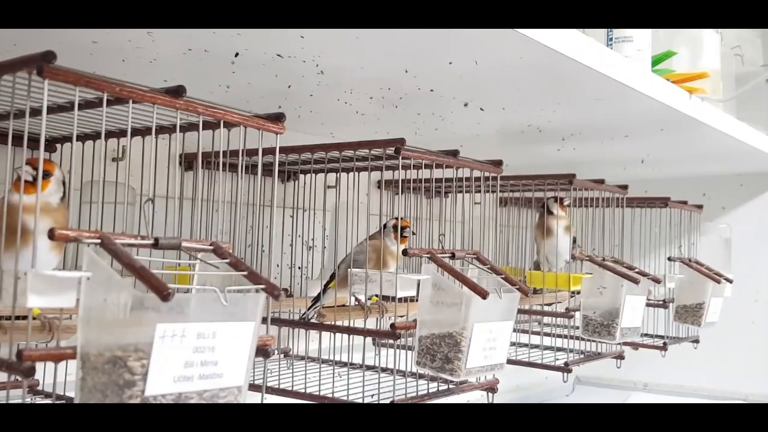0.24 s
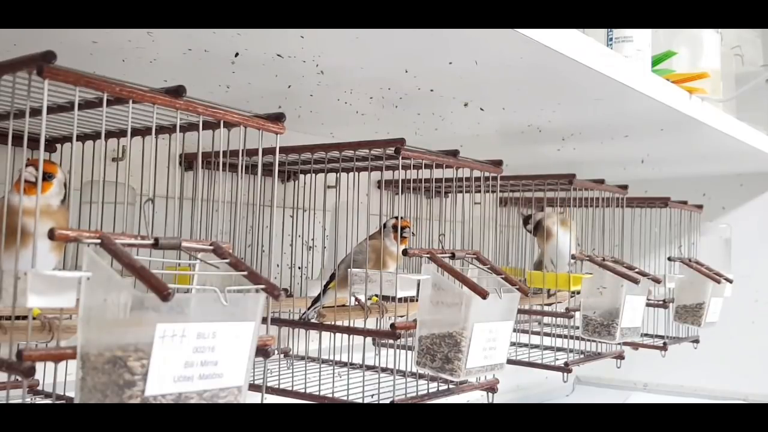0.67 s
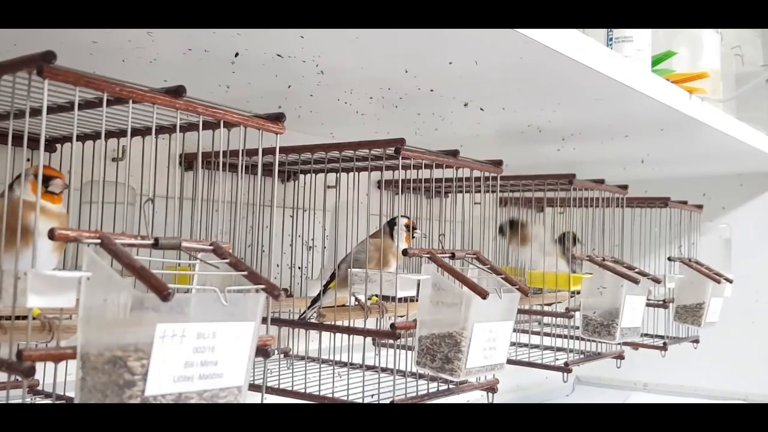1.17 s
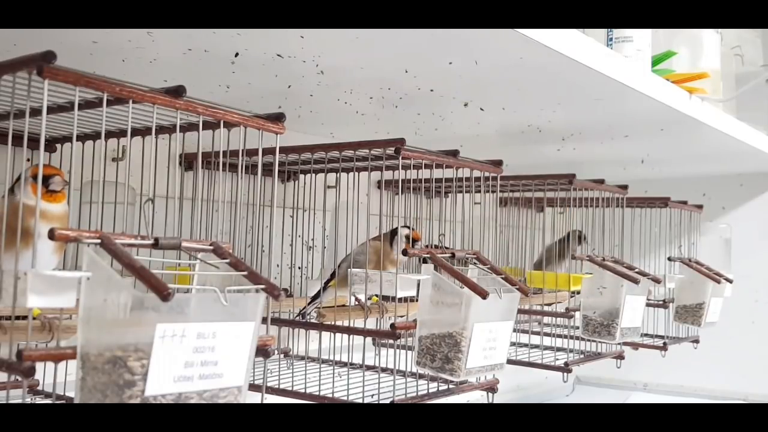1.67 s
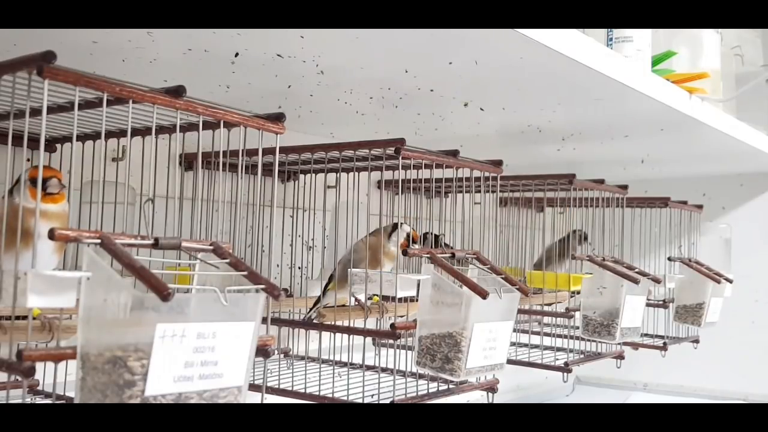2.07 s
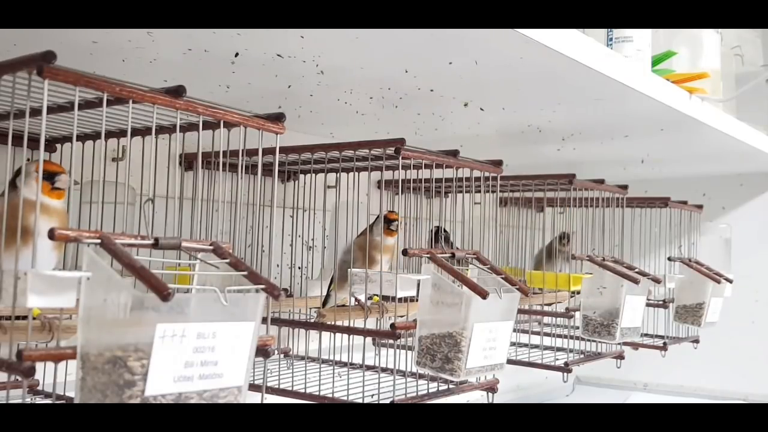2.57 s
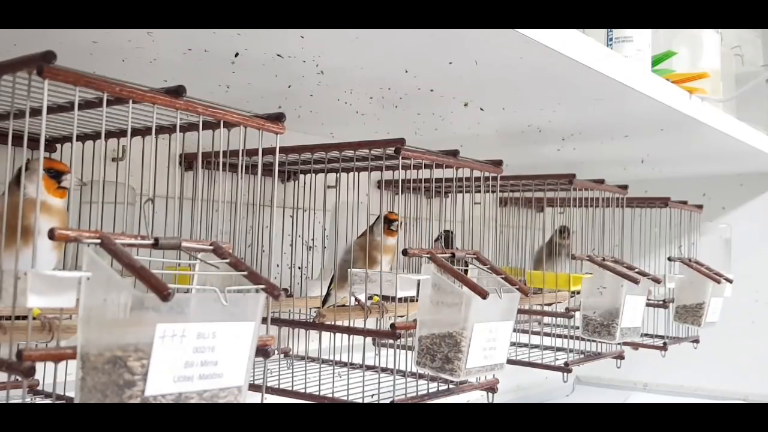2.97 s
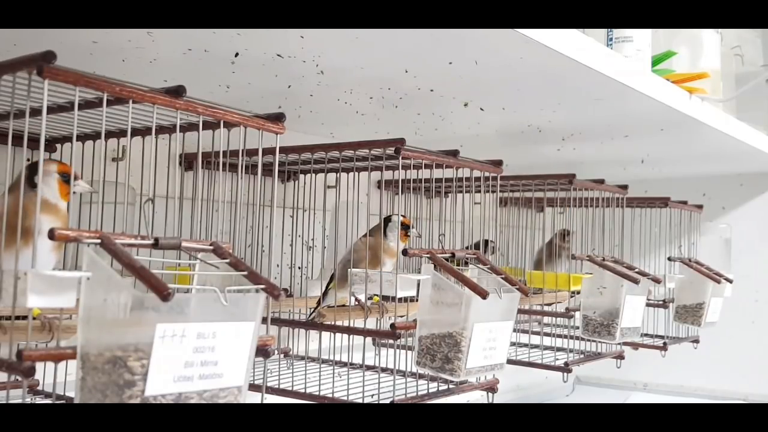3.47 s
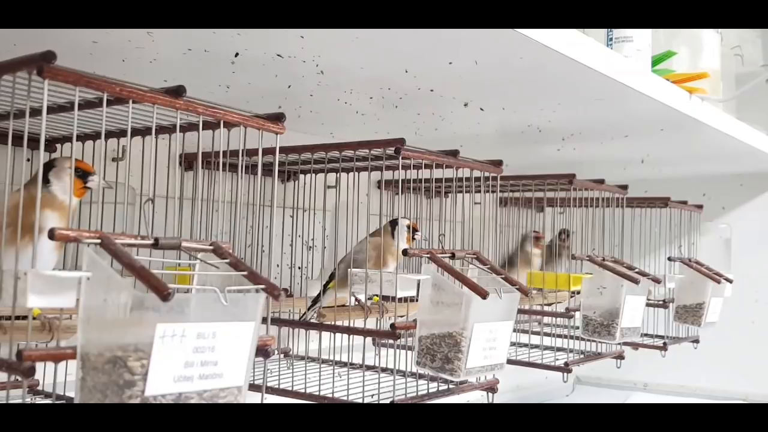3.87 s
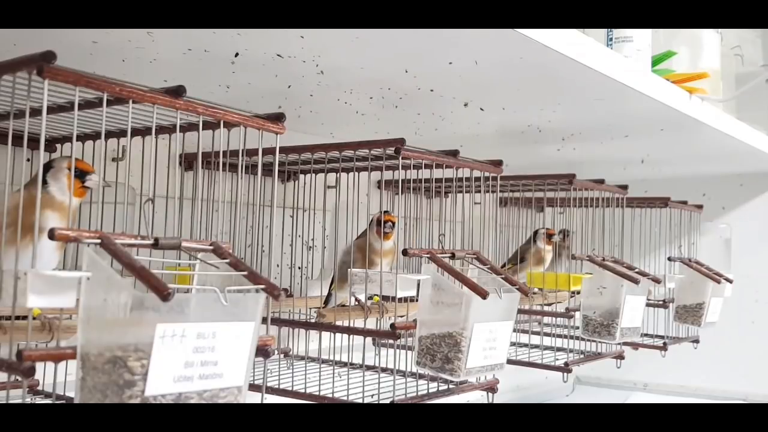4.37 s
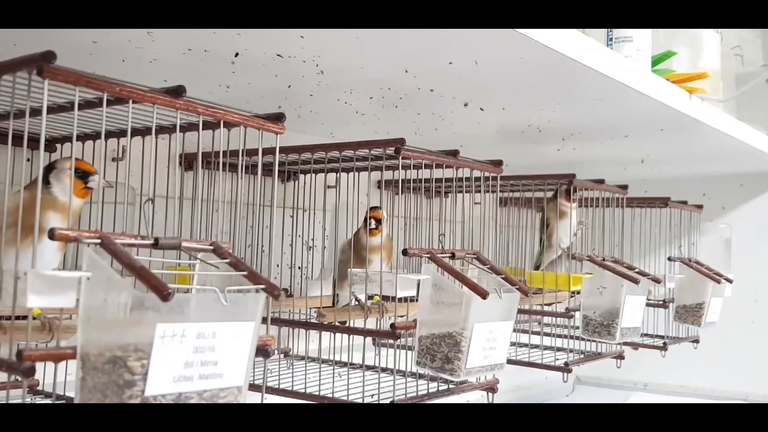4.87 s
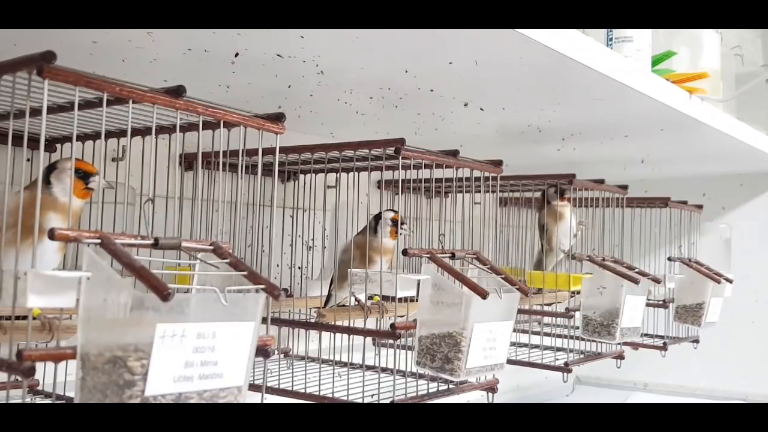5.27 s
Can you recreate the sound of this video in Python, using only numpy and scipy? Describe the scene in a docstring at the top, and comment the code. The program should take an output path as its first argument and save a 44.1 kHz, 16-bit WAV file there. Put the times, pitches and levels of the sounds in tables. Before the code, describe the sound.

Several small caged finches twitter at once, fast tinkling high chirps overlapping close by in a hard-walled room, over a faint low hum.

```python
"""Caged goldfinches twittering

Goldfinches in a row of small cages twitter all at once in a hard-walled room, near a stereo microphone.
Notes are gliding sines with a weak octave, or chopped noise bands; random taps make a short ringing tail.
Random short glides form a babble of farther birds; treble hiss follows the song.
Behind lie patchy low-mid noise, a low rumble of shaped noise, and narrow noise for motor hum."""
import sys
import numpy as np
from scipy import signal
from scipy.fft import rfft, irfft
from scipy.io import wavfile
from scipy.ndimage import uniform_filter1d

SR = 44100
rng = np.random.default_rng(int(sys.argv[2]) if len(sys.argv) > 2 else 0)


def dump(signal):
    """Clip the signal to [-1, 1] and save it as 16-bit WAV at the path in sys.argv[1]."""
    limited = np.clip(np.atleast_2d(signal).T, -1, 1)
    pcm = np.round(limited * 32767).astype(np.int16)
    wavfile.write(sys.argv[1], SR, pcm)


N = 243873

# Near whistles, before the final balance:
# (time [s], length [ms], start [Hz], end [Hz], level [dB], left over right [dB])
NEAR_NOTES = [(0.009, 10.5, 4840, 3760, -15, 5), (0.057, 18.0, 3380, 3560, -19.5, 12),
              (0.137, 17.4, 3440, 4180, -14, 1.5), (0.179, 36, 3990, 3770, -24.5, 2),
              (0.191, 25, 4730, 4800, -21.5, 0), (0.195, 30.0, 8160, 6000, -26, 2),
              (0.217, 45, 5470, 3430, -19.5, -2), (0.263, 8.3, 4730, 4690, -23, 22),
              (0.267, 12.6, 7350, 7740, -38, 18), (0.275, 19, 4870, 4810, -24.0, -5),
              (0.278, 24, 3640, 3680, -23, -2.0), (0.291, 9.5, 5070, 5720, -21, 7),
              (0.312, 16, 6300, 8180, -23.5, 18), (0.37, 28.0, 2650, 3300, -32, 6.0),
              (0.409, 7.3, 3700, 4700, -12, 5), (0.415, 19.4, 4720, 4440, -13, 5),
              (0.483, 27, 3610, 5190, -17, -4), (0.561, 13.5, 3800, 4900, -14, 5),
              (0.574, 79, 6160, 6250, -29, -6), (0.583, 24, 7550, 6400, -29.0, 1),
              (0.593, 33, 5150, 5100, -29, -6), (0.605, 24, 2978, 3590, -16.5, 0),
              (0.632, 34, 3400, 3450, -15.5, 0.0), (0.708, 17, 3600, 5020, -12.5, 6),
              (0.726, 14.5, 3920, 4620, -16, -15), (0.793, 37, 6100, 6080, -25.5, -2),
              (0.8, 35, 8660, 8700, -28, 3), (0.824, 29, 4510, 3670, -15.5, 0),
              (0.827, 14, 5150, 4600, -18.5, 4), (0.832, 24, 9450, 7200, -28, 10),
              (0.86, 23.4, 3020, 3940, -20, -1), (0.876, 17, 5900, 7000, -26.5, -6),
              (0.876, 13, 5000, 5740, -23.0, 3.0), (0.907, 52, 6800, 6100, -26, -8),
              (0.927, 17, 8350, 7320, -19, 3), (0.963, 44, 8930, 6440, -31, 17.5),
              (0.98, 17.6, 6440, 5100, -16.5, 4.0), (1.008, 37, 7400, 5880, -21, -8),
              (1.025, 12, 5300, 5240, -15.5, 4), (1.033, 14, 3310, 4050, -22.5, 5),
              (1.088, 21, 4730, 3970, -23, -2.5), (1.104, 9.5, 3970, 4520, -12, 1.0),
              (1.112, 17, 3420, 3610, -19, 0.5), (1.131, 20.6, 5370, 5290, -11.5, 0.0),
              (1.169, 46.4, 3260, 3472, -23.5, -0.5), (1.225, 52, 4700, 4770, -24, 0),
              (1.231, 54, 3955, 4034, -22, -1.5), (1.291, 15.5, 4920, 5430, -15.5, -3),
              (1.334, 23.1, 4110, 4020, -29.5, -19), (1.37, 31, 4070, 3780, -27, -2),
              (1.392, 21, 8900, 6300, -24.0, 10), (1.404, 16.5, 2800, 3400, -29, 19),
              (1.415, 29, 6900, 6800, -35, -7), (1.508, 6.6, 3870, 4530, -9.5, 1.5),
              (1.516, 11, 4360, 5260, -22.5, 0), (1.578, 27, 2560, 3760, -21.5, 0),
              (1.608, 18.5, 3500, 4240, -19, 0.0), (1.619, 39, 6290, 6380, -33, -14),
              (1.63, 23.6, 3900, 5100, -17.5, -4.0), (1.667, 24, 7500, 5730, -24.5, -0.5),
              (1.741, 15.5, 3320, 3470, -24, 0), (1.752, 11.6, 5010, 5030, -24.5, 7),
              (1.78, 27, 6200, 6090, -29, -2), (1.78, 59, 7620, 7400, -30.5, -6),
              (1.818, 28, 4340, 4620, -27.5, -2), (1.845, 20, 2500, 2580, -34, 4),
              (1.855, 41, 1910, 2190, -42, 0.0), (1.862, 25.5, 3850, 3990, -26.5, 4),
              (1.89, 25.5, 3390, 4630, -27.5, -2.5), (1.972, 33.3, 8300, 5750, -35.5, 22),
              (2.203, 62, 1535, 2030, -34.5, 1), (2.228, 21, 3630, 3760, -21, 0.0),
              (2.273, 21, 3686, 4130, -15, -1), (2.31, 22, 5000, 5000, -30, 2),
              (2.328, 57.9, 7860, 7800, -27.5, 2.5), (2.351, 42.5, 6370, 6320, -29.5, 6),
              (2.377, 39, 7920, 6040, -30.5, -21), (2.45, 21.4, 4064, 4424, -11, 0),
              (2.456, 42, 8940, 7130, -37, 7), (2.474, 15, 2920, 3620, -26, -6),
              (2.555, 81, 6380, 6200, -29.5, -13), (2.6, 73, 1905, 2280, -37.5, 0.0),
              (2.73, 22.4, 2750, 3100, -26, -6), (2.8, 18, 6020, 6670, -25.5, -7.0),
              (2.925, 15, 4900, 5900, -26.5, -12), (3.052, 23, 5300, 5080, -25.5, -9.0),
              (3.058, 25, 2580, 3100, -36, -7), (3.142, 25, 2340, 2930, -25, 0.5),
              (3.16, 30, 3690, 3870, -31, -27), (3.213, 32, 4200, 5160, -23, 1.5),
              (3.231, 49, 5540, 5820, -31.0, -18.5), (3.261, 15, 2940, 4110, -20, 1.0),
              (3.282, 69, 3700, 4204, -23, -8), (3.356, 28, 4450, 4020, -19.5, 1),
              (3.386, 21, 3820, 3370, -23, -12), (3.443, 48, 1908, 1746, -44.5, -25),
              (3.488, 27.5, 4240, 3687, -30.5, -29), (3.54, 39, 3705, 3874, -28, -21),
              (3.578, 110, 3465, 3390, -24.5, -2), (3.679, 27, 1500, 2135, -34, 0),
              (3.71, 31, 4000, 3700, -28.0, -14), (3.74, 21, 2170, 3350, -29, 0.0),
              (3.781, 42, 5380, 5050, -24.5, -9), (3.805, 42.4, 5510, 5020, -20.5, -9),
              (3.84, 48, 3650, 4210, -23.5, -2.0), (3.875, 28, 4380, 5230, -18, 1),
              (3.9, 37, 5100, 5000, -18.5, -1), (3.93, 20, 1984, 2205, -31, 10.5),
              (3.934, 30, 3930, 4275, -19, 1.0), (3.945, 14, 3040, 3100, -28, 4),
              (3.946, 38, 4860, 4940, -23, 8.0), (3.979, 15.4, 5610, 4880, -21.0, -17),
              (4.004, 25, 2930, 3010, -24.5, 13), (4.024, 33, 5850, 6390, -31, -4.0),
              (4.03, 28.0, 3152, 3140, -17, -1), (4.055, 20.0, 3190, 4220, -19.5, -10),
              (4.119, 56, 4120, 4120, -24.5, -6.0), (4.138, 14.0, 7400, 6470, -27, -6.0),
              (4.152, 34, 6390, 6200, -18, -5), (4.154, 34.4, 5300, 4835, -13.5, 1),
              (4.194, 38, 4490, 3840, -14.5, 0), (4.245, 62, 6400, 5460, -24, -4),
              (4.333, 30.5, 4290, 4317, -18, -1), (4.382, 59, 5550, 5170, -23, -2),
              (4.422, 13, 1900, 2660, -29.5, 9), (4.432, 11.5, 2650, 4000, -16.5, 0.5),
              (4.442, 21, 3870, 4530, -11.5, 0), (4.445, 25, 4980, 6050, -20, -1),
              (4.446, 41, 8670, 6100, -27, -6), (4.49, 25, 2620, 2600, -29.5, -0.5),
              (4.512, 20, 1966, 2140, -29, 1), (4.53, 23, 2810, 3000, -20.5, -3),
              (4.558, 26, 2920, 3710, -23, 0), (4.627, 14, 1600, 3210, -24, 7.5),
              (4.639, 11.8, 3690, 3940, -13.0, -1.5), (4.646, 23, 5120, 4440, -25, 2),
              (4.706, 11.7, 2730, 3990, -14.5, 0), (4.712, 25.5, 4060, 4860, -12.5, 2),
              (4.79, 12, 4330, 4490, -16.5, -2), (4.797, 26, 3010, 3570, -22, -2.0),
              (4.806, 19, 4880, 5050, -14.5, 2), (4.867, 13, 6800, 7050, -29, 9),
              (4.887, 26, 8700, 6680, -32, 10), (4.888, 29, 5570, 5610, -27.5, 10),
              (4.913, 19, 3360, 3910, -19, 5.5), (4.93, 10, 1940, 3430, -35, -1.5),
              (4.942, 13, 3566, 4010, -15, -7), (4.985, 11.8, 4470, 4370, -19.5, 4.0),
              (4.993, 14.0, 4820, 6490, -22.5, -5.0), (5.0, 9.6, 9200, 7400, -21.0, 14.5),
              (5.012, 15, 4600, 4790, -19.5, -4), (5.014, 37, 7400, 5840, -16, 2.5),
              (5.105, 7.4, 4030, 5540, -21, 4), (5.147, 18.3, 3340, 4250, -15.5, 4),
              (5.158, 31, 7300, 7450, -26.5, 0.0), (5.17, 13, 7100, 5440, -21, 3),
              (5.186, 18, 5410, 5450, -11.5, -1), (5.198, 10.7, 5450, 6800, -19, -10),
              (5.239, 15.2, 4300, 4540, -10, 1), (5.268, 9.5, 4900, 5100, -22, 9.0),
              (5.3, 51, 6540, 6260, -20.5, -8.5), (5.333, 30, 3620, 5860, -24.5, 19),
              (5.367, 36, 6160, 6000, -27, -11), (5.405, 10.0, 3240, 4130, -11.5, 1),
              (5.412, 15, 4270, 4250, -12, 0.5), (5.417, 21.4, 5310, 4360, -12, -1),
              (5.422, 9.4, 4130, 3960, -25, -18.0), (5.474, 30, 4930, 5860, -27, -3.0),
              (5.481, 44, 7380, 6340, -26, -13)]


def near_whistles():
    """Each near note is a whistle that glides from one pitch to another."""
    return sing(NEAR_NOTES, crest=0.44)


def sing(rows, crest):
    """Plays a table of notes with a slight unsteadiness of pitch and level."""
    out = np.zeros((2, N))
    waver = drift(N + SR, turns_per_s=560.0)
    flutter = drift(N + SR, turns_per_s=320.0)
    for row in rows:
        add(out, row[0], whistle(row, crest, waver, flutter))
    return out


HOOK = 0.6  # glide exponent; below 1 the glide is fastest at the start
SWELL_DB, EDGE_MS = 10, 0.96
LATER_PER_OCTAVE = 0.23  # wide glides are loudest later, near the pitch where they settle
LEFT_LEAD_S = 0.00019  # cages on the left reach the left microphone this much earlier
WAVER_SHARE, FLUTTER_DB = 0.014, 2.52  # rms unsteadiness of pitch and level


def whistle(row, crest, waver, flutter):
    """A near sine on a hooked glide with a weak octave; crest = place of the loudest point, 0-1."""
    time_s, length_ms, start_hz, end_hz, level_db, pan_db = row
    u = np.linspace(0, 1, max(int(length_ms * SR / 1000), 64))
    at = max(int(time_s * SR), 0)
    span = slice(at, at + len(u))

    glide_hz = start_hz + (end_hz - start_hz) * u ** HOOK
    hz = glide_hz * (1 + WAVER_SHARE * waver[span])

    crest = np.clip(crest + LATER_PER_OCTAVE * abs(np.log2(end_hz / start_hz)), 0.1, 0.9)
    from_crest = np.maximum(1 - u / crest, (u - crest) / (1 - crest))
    edges = np.minimum(np.minimum(u, 1 - u) * length_ms / EDGE_MS, 1)
    level = gain_of(level_db + FLUTTER_DB * flutter[span]) * np.sqrt(2)
    envelope = gain_of(-SWELL_DB * from_crest) * edges * level

    delay_s = LEFT_LEAD_S * np.array([[0], [pan_db > 0]])
    phase = 2 * np.pi * np.cumsum(hz) / SR - 2 * np.pi * hz * delay_s
    below_nyquist = 2 * hz < SR / 2
    tone = np.sin(phase) + gain_of(-26) * np.sin(2 * phase) * below_nyquist
    return tone * envelope * gain_of([[pan_db / 2], [-pan_db / 2]])


# Rasping notes and treble bursts standing for octaves of whistles, level before chop:
# (time [s], length [ms], centre [Hz], width [Hz], level [dB])
NOISY_BANDS = [(0.104, 21, 6200, 2500, -48), (1.286, 36, 7160, 2580, -39), (2.13, 15, 6550, 2020, -42),
               (2.239, 54, 7300, 2600, -37.5), (2.08, 330, 3250, 2010, -36), (2.6, 78, 4600, 1100, -25.5),
               (2.8, 74, 6820, 1110, -25.5), (2.939, 63, 6050, 1000, -25), (3.94, 54, 4620, 1200, -23),
               (3.079, 78, 5960, 1500, -30.5), (3.34, 77, 5700, 1770, -29.5), (3.49, 48, 5200, 2020, -25),
               (3.587, 23, 4640, 2620, -25.5), (3.86, 150, 6100, 1820, -33.5), (2.79, 25, 11900, 2500, -38),
               (3.219, 56, 10200, 2310, -41), (3.789, 117, 10400, 1990, -38), (5.241, 48, 3350, 1290, -31),
               (5.341, 40, 7600, 1510, -36.5)]


def noisy_bands():
    """Noisy bands with fast chop: rasping notes, and treble bursts standing for octaves of whistles."""
    out = np.zeros((2, N))
    hz = np.fft.rfftfreq(16384, 1 / SR)
    for time_s, length_ms, centre_hz, width_hz, level_db in NOISY_BANDS:
        t = np.arange(int(length_ms * SR / 1000)) / SR
        bell = np.exp(-2 * ((hz - centre_hz) / width_hz) ** 2)
        band = evened(irfft(rfft(rng.standard_normal((2, 16384))) * bell))
        chop = 1 + 0.58 * np.sin(2 * np.pi * 160 * t)
        fade = signal.windows.tukey(len(t), 0.4)
        add(out, time_s, gain_of(level_db) * band[:, :len(t)] * chop * fade)
    return out


# Far birds, base level before pitch colour and spread: (time [s], level [dB])
BABBLE_LEVEL = [(0, -25.5), (1, -27), (1.8, -36.5), (2.3, -28), (2.9, -37.5), (3.9, -28), (4.6, -34),
                (5.53, -26.5)]
# Relative level of far notes by pitch: (pitch [Hz], level [dB])
BABBLE_COLOUR = [(880, -69), (1500, -14), (1640, -33.5), (1890, -20), (3010, -5.5), (3890, -1.5),
                 (6420, -6), (9000, -33), (11700, -53), (19800, -120)]
BABBLE_NOTES_PER_S = 280


def babble():
    """Many short, steep notes from the far cages, pitched within the flock's range."""
    count = int(BABBLE_NOTES_PER_S * N / SR)
    when, height, slope, loudness, length, side = rng.random((count, 6)).T
    time_s = when * N / SR
    pitch_hz = 1500 * (9000 / 1500) ** height
    glide = 1 + 0.601 * (slope - 0.35)
    spread_db = 14.06 * loudness ** 2 - 8.0
    level_db = np.interp(time_s, *np.transpose(BABBLE_LEVEL)) + read(BABBLE_COLOUR, pitch_hz) + spread_db
    length_ms = 6 + 20 * length ** 2
    pan_db = 16.0 * (side - 0.5)
    start_hz, end_hz = pitch_hz / glide, pitch_hz * glide ** 0.5
    rows = np.transpose([time_s, length_ms, start_hz, end_hz, level_db, pan_db])
    return sing(rows, crest=0.55)


# Decay time of the walls: (frequency [Hz], t60 [s])
WALL_T60 = [(1500, 0.23), (4000, 0.55), (7000, 0.36), (12000, 0.12)]


def room(x, first_ms):
    """Sparse taps of random sign, other ones for each side, each band dying at its own speed."""
    taps = np.zeros((2, SR // 2))
    at = np.arange(int(first_ms * SR / 1000), SR // 2 - 20, 20)
    at = at + rng.integers(0, 20, (2, SR // 40))[:, :len(at)]
    signs = rng.choice([-1., 1.], (2, SR // 40))[:, :at.shape[1]]
    np.put_along_axis(taps, at, signs, 1)
    hz, t, z = signal.stft(taps, SR, nperseg=128)
    decay = gain_of(-60 * t / read(WALL_T60, hz)[:, None])
    tail = signal.istft(z * decay, SR, nperseg=128)[1]
    return signal.fftconvolve(x, tail / np.linalg.norm(tail[0]), axes=1)[:, :x.shape[1]]


# Treble hiss spectrum: (frequency [Hz], relative density [dB per Hz])
HISS_COLOUR = [(3530, -56), (6000, -5.5), (7900, 7), (8890, 2), (12200, 5), (13400, 1), (15000, -84)]


def haze(song):
    """Thin treble hiss that swells and fades with the song."""
    power = abs(uniform_filter1d((song ** 2).mean(0), 900))
    follow = (power / power.mean() + 1e-6) ** 0.29
    return gain_of(-40.5) * follow * noise(HISS_COLOUR, likeness=0.042, patchy_db=7.0)


# Low-mid noise level: (time [s], level [dB])
LOW_MID_LEVEL = [(0, -62), (.45, -64.5), (.7, -78), (1.4, -54), (1.75, -59), (1.85, -41), (2.2, -58),
                 (2.35, -105), (2.55, -50.5), (3.4, -54), (3.56, -39.5), (3.8, -50.5), (5.0, -67),
                 (5.25, -70), (5.35, -86), (5.53, -98)]
# Low-mid noise spectrum: (frequency [Hz], relative density [dB per Hz])
LOW_MID_COLOUR = [(130, -70), (220, 6.5), (402, -2.5), (610, 0.5), (1140, -12), (1500, -27), (1950, 4),
                  (3300, -120)]


def low_mid_noise():
    """Patchy low-mid noise, its level set by a curve."""
    return level_curve(LOW_MID_LEVEL) * noise(LOW_MID_COLOUR, likeness=0.32, patchy_db=6.5)


# Low room noise spectrum: (frequency [Hz], relative density [dB per Hz])
RUMBLE_COLOUR = [(15, -73), (25, -37), (65, -18), (92, -1), (130, -7.5), (190, -12), (260, -18.5),
                 (340, -36), (570, -120)]
# Low room noise level: (time [s], level [dB])
RUMBLE_LEVEL = [(0, -61.5), (1, -60.5), (2.5, -55.5), (4, -54), (5.53, -56.5)]


def rumble():
    """Low shaped room noise, partly alike at both microphones."""
    return level_curve(RUMBLE_LEVEL) * noise(RUMBLE_COLOUR, likeness=0.59, patchy_db=2.0)


# Wavering motor tones: (centre [Hz], width [Hz], level [dB])
HUM_TONES = [(101.7, 16.5, -57), (197.1, 5.5, -65.5)]


def hum():
    """Narrow noise around each motor tone, nearly alike at both microphones."""
    hz, out = np.fft.rfftfreq(N, 1 / SR), np.zeros((2, N))
    for centre_hz, width_hz, level_db in HUM_TONES:
        common, left, right = rng.standard_normal((3, N))
        pair = rfft([common + 0.25 * left, common + 0.11 * right])
        resonance = 1 / (1 + ((hz - centre_hz) / (width_hz / 2)) ** 2)
        out += gain_of(level_db) * evened(irfft(pair * resonance, N))
    return out


def noise(colour, likeness, patchy_db):
    """Stereo noise of a given spectrum with drifting patches; likeness = left-right correlation."""
    frames, hz = N // 256 + 5, np.fft.rfftfreq(1024, 1 / SR)
    a, b, c, d, patches = rng.standard_normal((frames, 513, 5)).T
    patches = evened(uniform_filter1d(uniform_filter1d(patches, 10, 0), 10, 1))
    left, other = a + 1j * b, c + 1j * d
    right = likeness * left + np.sqrt(1 - likeness ** 2) * other
    z = np.array([left, right]) * gain_of(read(colour, hz)[:, None] + patchy_db * patches)
    return evened(signal.istft(z, nperseg=1024, noverlap=768)[1][:, :N])


def drift(size, turns_per_s):
    """Smoothed random curve of rms 1 that turns about turns_per_s times a second."""
    span = max(int(SR / turns_per_s), 2)
    return evened(uniform_filter1d(uniform_filter1d(rng.standard_normal(size), span), span))


def gain_of(db):
    """Amplitude factor of a level in dB."""
    return 10 ** (np.asarray(db) / 20)


def evened(x):
    """Scales to rms 1."""
    return x / np.sqrt(np.mean(x ** 2) + 1e-20)


def read(points, hz):
    """Interpolates a table over log frequency."""
    f, value = np.transpose(points)
    return np.interp(np.log(hz + 1), np.log(f + 1), value)


def level_curve(points):
    """Gain over time from (time [s], level [dB])."""
    return gain_of(np.interp(np.arange(N) / SR, *np.transpose(points)))


def add(mix, time_s, sound):
    """Adds a sound into the mix in place, cut at the end."""
    part = mix[:, max(round(time_s * SR), 0):][:, :sound.shape[1]]
    part += sound[:, :part.shape[1]]


def scene():
    """Near and far birds with their wall tails, over hiss, low-mid noise, hum and rumble."""
    near, far = near_whistles() + noisy_bands(), babble()
    near_tail = room(near, first_ms=6.)

    lead = SR // 2  # the far birds were already singing: a mirrored opening primes the walls
    far_with_lead = np.hstack([far[:, ::-1][:, -lead:], far])
    far_tail = room(far_with_lead, first_ms=4.)[:, lead:]

    birds = near + gain_of(-4.5) * near_tail + gain_of(-2.0) * far + gain_of(4.0) * far_tail
    no_lows = signal.butter(6, 1500, "high", fs=SR, output="sos")  # small throats give no lows
    birds = signal.sosfilt(no_lows, birds)
    balance = gain_of([[0.6], [-0.6]])
    return (birds + haze(birds)) * balance + low_mid_noise() + hum() + rumble()


EDGE_HZ = 14800


def record(dry):
    """The band limit of the recorder: a steep linear-phase low-pass."""
    low_pass = signal.firwin(511, EDGE_HZ, window=("kaiser", 9), fs=SR)
    return signal.oaconvolve(dry, low_pass[None], "same")


dry = scene()
out = record(dry)
dump(out)
```